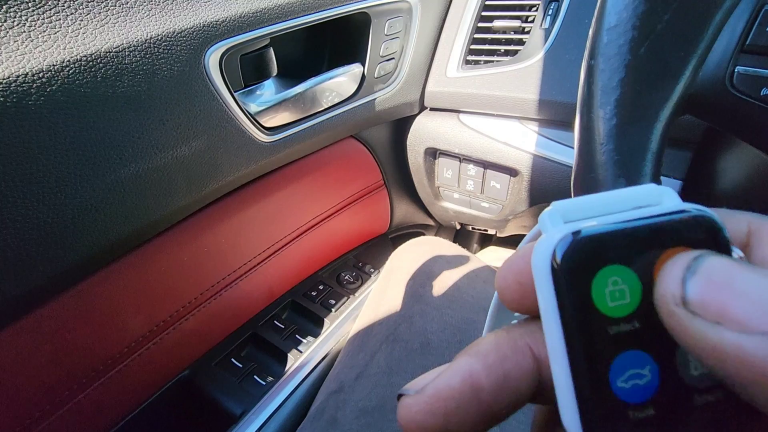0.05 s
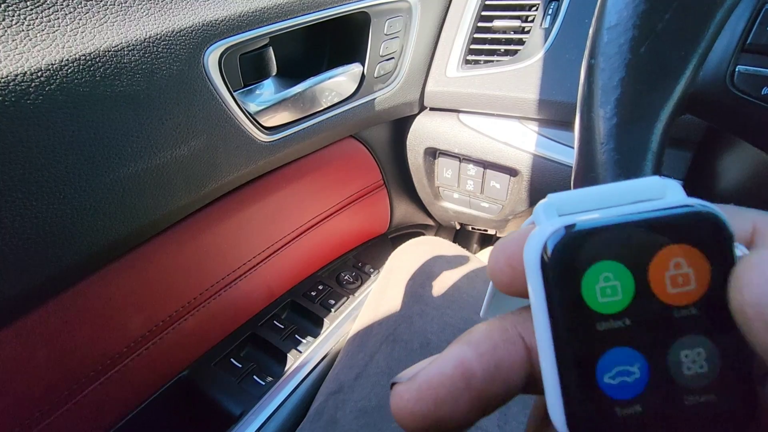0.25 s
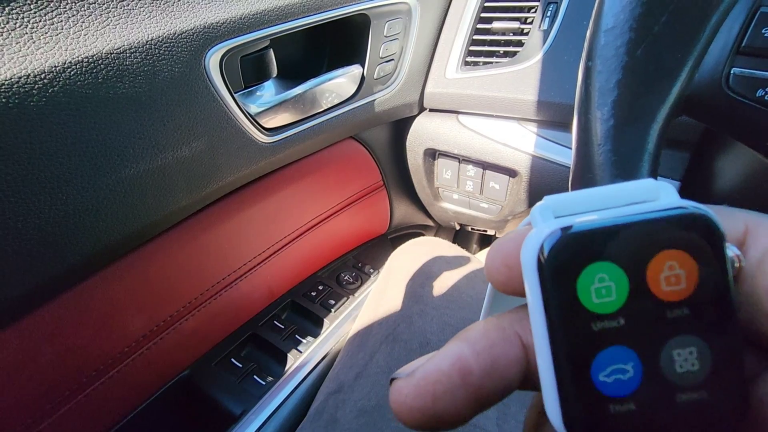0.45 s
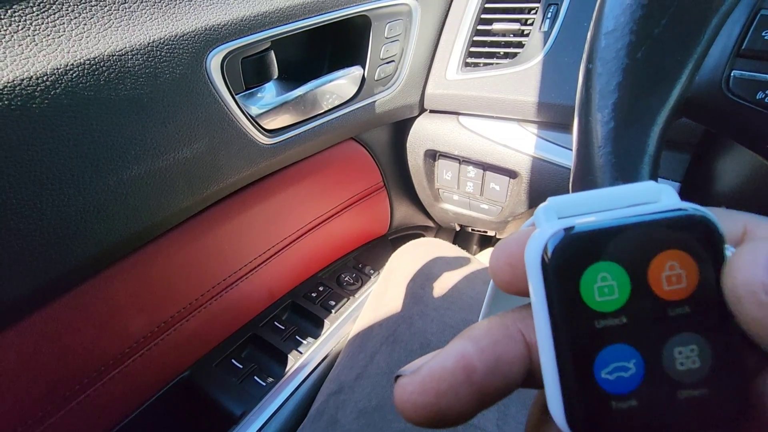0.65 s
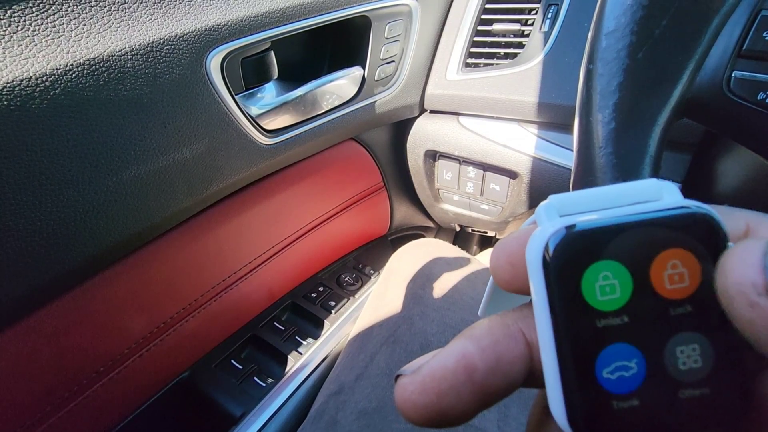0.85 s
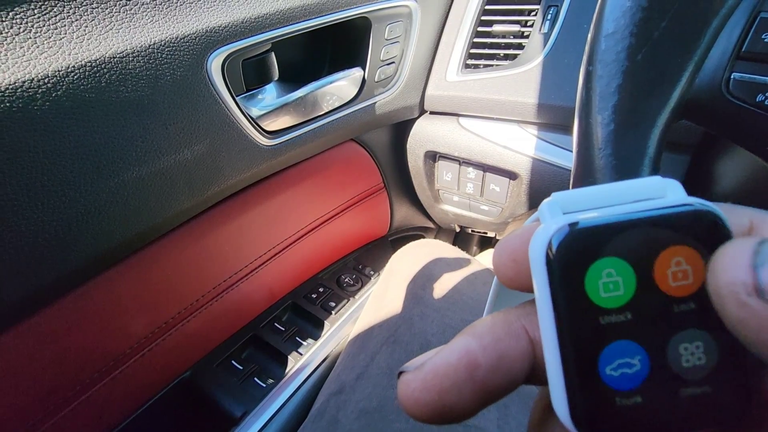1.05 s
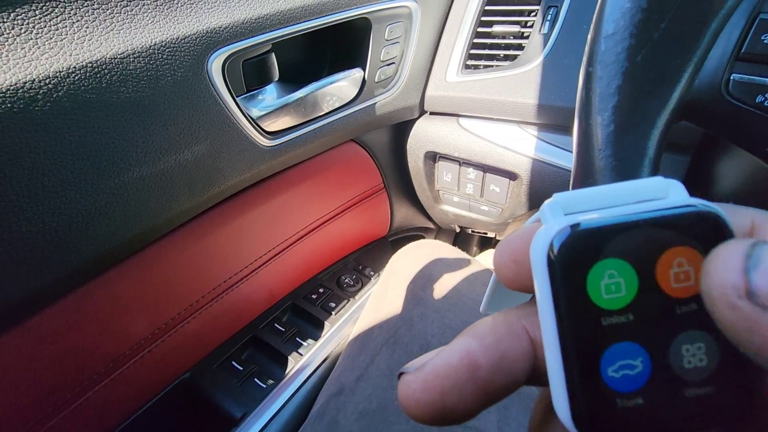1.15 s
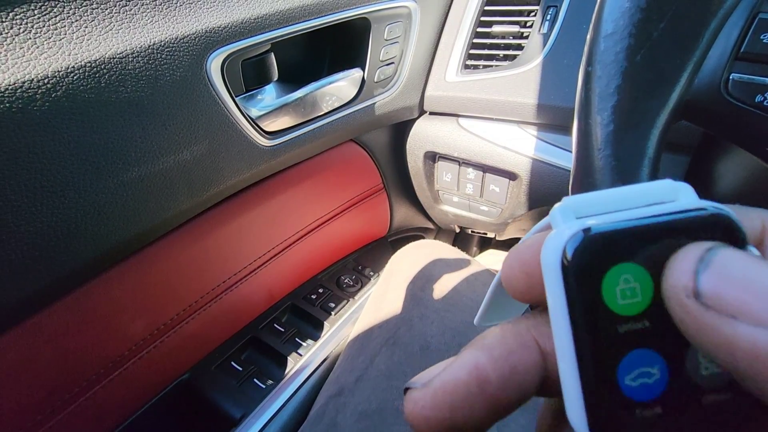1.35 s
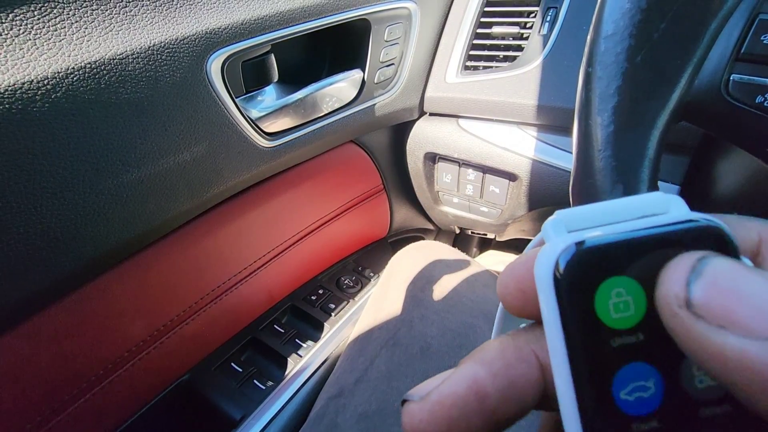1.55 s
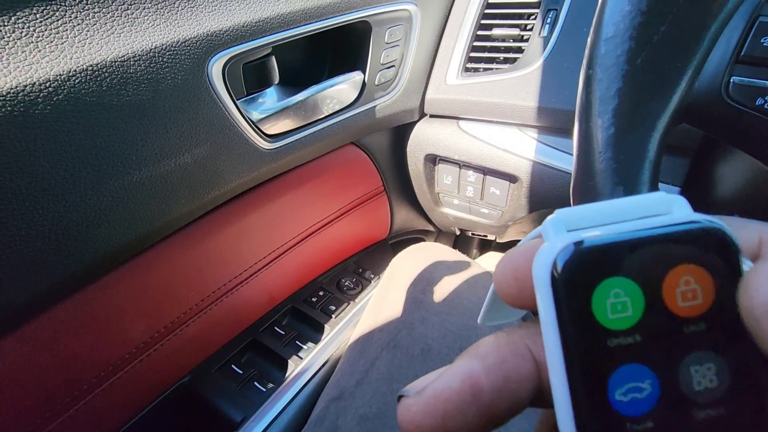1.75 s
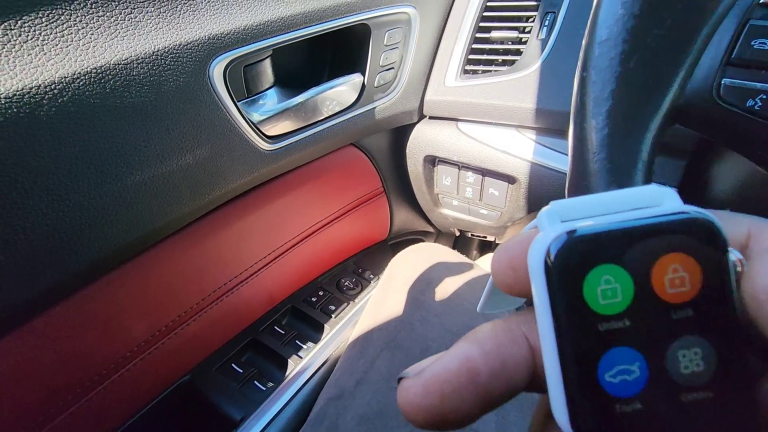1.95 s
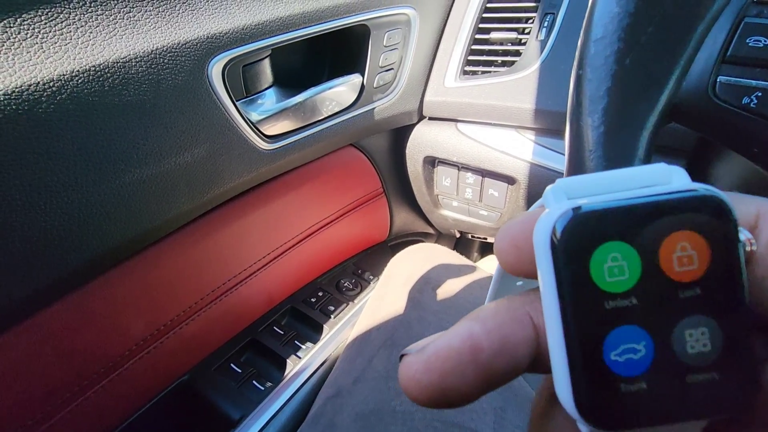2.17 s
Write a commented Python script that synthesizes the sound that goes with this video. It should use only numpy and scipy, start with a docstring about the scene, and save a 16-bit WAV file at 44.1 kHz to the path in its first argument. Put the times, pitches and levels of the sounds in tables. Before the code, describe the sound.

Inside a quiet parked car, muffled low rumble of distant traffic runs first; then the central locking fires with one sharp, rattling clunk, picked up close in stereo with a very short, dry cabin reflection.

```python
"""A low outside rumble with distant traffic is heard first, through the body of a parked car.
The power locks then shut: a relay ticks, a whirr swells, and the latches of several doors snap over
within a tenth of a second and thump the door panels. The background is noise shaped in pitch and time;
relay, latches and panels are sums of decaying modes, with noise for the hiss, whirr and rattle.
Sparse reflections inside the cabin follow the relay and latches."""
import sys
import numpy as np
from scipy import signal
from scipy.fft import rfft, irfft
from scipy.io import wavfile
from scipy.ndimage import uniform_filter1d

SR = 44100
rng = np.random.default_rng(int(sys.argv[2]) if len(sys.argv) > 2 else 0)


def persist_wave(psi):
    """Save psi, clipped to +-1, as 16-bit WAV."""
    counts = np.round(np.clip(psi, -1, 1) * 32767).astype(np.int16)
    wavfile.write(sys.argv[1], SR, np.atleast_2d(counts).T)


N = 97416  # length in samples


def amp(db):
    """Decibel law: twenty decibels are a factor of ten in amplitude."""
    return 10 ** (np.asarray(db) / 20)


def evened(x):
    """Normalisation to unit root-mean-square amplitude."""
    return x / np.sqrt(np.mean(x ** 2) + 1e-20)


def read(points, hz):
    """Spectral interpolation on a logarithmic pitch axis."""
    point_hz, value = np.transpose(points)
    return np.interp(np.log(hz + 1), np.log(point_hz + 1), value)


def add(mix, start_s, sound):
    """Superposition: a sound adds to the mix from its start time."""
    part = mix[:, round(start_s * SR):][:, :sound.shape[1]]
    part += sound[:, :part.shape[1]]


def panned(left_minus_right_db):
    """Interaural level difference, split equally between left and right gains."""
    return amp(np.multiply.outer([.5, -.5], left_minus_right_db))


def puff(centre_hz, width_hz):
    """Band-limited noise: independent stereo noise under a Gaussian; width_hz is its 1/e half-width."""
    hz = np.fft.rfftfreq(N, 1 / SR)
    colour = np.exp(-((hz - centre_hz) / width_hz) ** 2)
    return evened(irfft(rfft(rng.standard_normal((2, N))) * colour, N))


def ring(modes, t, sign=-1):
    """Modal superposition: dying sines answer one click; mode k is weighted by sign ** k."""
    total = 0
    for k, (pitch_hz, level_db, t60_s) in enumerate(modes):
        decay = amp(level_db - 60 * t / t60_s)
        total = total + sign ** k * decay * np.sin(2 * np.pi * pitch_hz * t)
    return total


# Levels of the outside noise: start_s, rumble_db, drone_db, traffic_roar_db
OUTSIDE_LEVELS = [
    [(0.03, -30, -40.5, -51), (0.112, -41, -41.5, -52), (0.26, -34.5, -41, -52.5),
     (0.286, -39.5, -39, -53.5), (0.384, -38, -39.5, -54.5), (0.956, -40, -45, -57.5),
     (1.262, -40.5, -43.5, -58.5), (1.528, -42, -48.5, -56), (1.622, -52, -43.5, -57),
     (1.656, -40.5, -49.5, -61.5), (1.8, -42.5, -47.5, -58.5)],
]
# The outside noise dies away at the end: start_s, rumble_db, drone_db, traffic_roar_db
FADING_LEVELS = [(2.0, -38, -45.5, -58.5), (2.1, -38.5, -48.5, -60.5), (2.14, -45, -49, -59),
                 (2.21, -52, -54.5, -59)]


def level(column):
    """Amplitude envelope: one layer's level in dB, interpolated over time."""
    rows = np.array(list(OUTSIDE_LEVELS[0]) + FADING_LEVELS)
    return np.interp(np.arange(N) / SR, rows[:, 0], rows[:, column])


# Likeness of the two channels, 1 identical and negative opposed: pitch_hz, likeness (no unit)
CHANNEL_LIKENESS = [(60, 1), (130, 1), (290, 0.92), (640, 0.35), (1410, -0.093), (3100, 0.48), (6820, 0.75),
                    (15000, -0.52)]
# Stereo lean of the outside noise: pitch_hz, left_minus_right_db
OUTSIDE_LEAN = [(60, 2.5), (110, -1), (200, 4.5), (380, 4.5), (700, 2), (1290, 6.5), (2380, 10), (4400, 12),
                (8120, 3), (15000, 0)]
LEFT_LEAD_S = .00014


def band(shape, level_db, patchy_db):
    """Partially coherent noise: random short-time spectra, patchy in time and pitch, on a level curve."""
    frames, hz = N // 512 + 5, np.fft.rfftfreq(2048, 1 / SR)
    a, b, c, d, patches = rng.standard_normal((frames, len(hz), 5)).T
    patches = uniform_filter1d(patches, size=16, axis=0)  # across pitch
    patches = evened(uniform_filter1d(patches, size=6, axis=1))  # across time

    likeness = np.clip(read(CHANNEL_LIKENESS, hz), -1, 1)[:, None]
    left = a + 1j * b
    right = likeness * left + np.sqrt(1 - likeness ** 2) * (c + 1j * d)
    spectra = np.array([left, right])

    # Both ends of the spectrum are closed by steep skirts
    closed = [(shape[0][0] * .8, -60)] + list(shape) + [(shape[-1][0] * 1.15, -70)]
    spectra *= amp(read(closed, hz)[:, None] + patchy_db * patches)
    spectra *= panned(read(OUTSIDE_LEAN, hz))[:, :, None]
    spectra[0] *= np.exp(1j * 2 * np.pi * hz * LEFT_LEAD_S)[:, None]
    noise = signal.istft(spectra, nperseg=2048, noverlap=1536)[1][:, :N]
    return amp(level_db) * evened(noise)


# Level of a fuzzy hum: start_s, level_db
HUM_LEVELS = [(.5, -69.5), (1.3, -59), (1.45, -60), (1.65, -54), (1.819, -53), (1.999, -67.5)]
HUM_HZ, HUM_WIDTH_HZ = 244.2, 12


def hum():
    """Narrow-band noise: a small bandwidth gives a pitch with a fluctuating envelope."""
    start_s, level_db = np.transpose(HUM_LEVELS)
    envelope = amp(np.interp(np.arange(N) / SR, start_s, level_db))
    return envelope * puff(HUM_HZ, HUM_WIDTH_HZ)[0]


# Spectrum of the outside rumble: pitch_hz, density_db (dB per Hz)
RUMBLE_SPECTRUM = [(11, -37), (18, -8), (43, 11.5), (59, -6.5), (92, 11), (130, -13.5), (170, -44.5),
                   (290, -120)]
# Spectrum of the low drone: pitch_hz, density_db (dB per Hz)
DRONE_SPECTRUM = [(59, -32.5), (100, -6.5), (189, 6), (225, -10.5), (274, -5), (301, -7.5), (373, -19.5),
                  (450, -20.5), (580, -45), (990, -120)]
# Spectrum of the traffic roar: pitch_hz, density_db (dB per Hz)
ROAR_SPECTRUM = [(240, -29.5), (400, -6.5), (487, -5), (516, -10.5), (567, -3), (694, -1), (1170, -2),
                 (1600, -14), (2080, -41.5), (3520, -120)]
# Spectrum of the steady hiss: pitch_hz, density_db (dB per Hz)
HISS_SPECTRUM = [(850, -29.5), (1450, -4.5), (2090, -1.5), (2960, -13.5), (3200, -18.5), (4150, -15),
                 (5160, -28.5), (6100, -29.5), (9070, -41.5), (13000, -37), (15500, -44)]
HISS_DB = -65


def outside():
    """Superposition of noise bands: rumble, drone, traffic roar and hiss, with the hum."""
    fuzzy_hum = hum()
    rumble = band(RUMBLE_SPECTRUM, level(1), patchy_db=0.9)
    drone = band(DRONE_SPECTRUM, level(2), patchy_db=0.6)
    roar = band(ROAR_SPECTRUM, level(3), patchy_db=1.2)
    hiss = band(HISS_SPECTRUM, HISS_DB, patchy_db=-1.86)
    return rumble + drone + roar + hiss + fuzzy_hum


# Faint rustles, and a small tick at 1.425 s: centre_s, length_s (between 1/e points), level_db, pitch_hz,
# width_hz
RUSTLE_PUFFS = [(0.273, 0.057, -86.5, 5960, 2000), (0.399, 0.038, -72.5, 4630, 1210),
                (0.862, 0.034, -80, 5600, 250), (0.889, 0.013, -70, 4100, 300),
                (1.425, .004, -73, 5000, 3000), (1.72, 0.078, -79.5, 6070, 2000)]


def rustles():
    """Amplitude modulation: Gaussian puffs of treble noise, roughened by random steps in level."""
    t = np.arange(N) / SR
    steps = np.repeat(rng.standard_normal(N // 64 + 1), 64)[:N]
    scratch = evened(amp(2.2 * steps))
    total = np.zeros((2, N))
    for centre_s, length_s, level_db, pitch_hz, width_hz in RUSTLE_PUFFS:
        envelope = np.exp(-((t - centre_s) / (.5 * length_s)) ** 2)
        total += amp(level_db) * envelope * puff(pitch_hz, width_hz)
    return total * scratch


# Door panel modes, before the favouring of pitches: pitch_hz, level_db, t60_s
PANEL_MODES = [(65.7, -10, .4), (92.5, -15.5, 0.19), (118.9, -5.5, 0.26), (146, -2, 0.12),
               (184.5, 0.5, 0.1), (258.4, -3.5, 0.08), (300, -4, 0.098), (346.3, 1, .09), (431, -9, 0.11)]
PANEL_LEAN_DB, PANEL_LAG_S = 1, 0.00022  # left minus right level; delay of the right channel
FAVOUR_DB_PER_OCT2 = -5  # modes far from the favoured pitch are rung less


def thump(level_db, push_s, favoured_hz):
    """Forced modal response: convolution with a soft push rings the panel modes."""
    t = np.arange(SR // 2) / SR
    push = np.sin(np.pi * np.minimum(t[:1000] / push_s, 1)) ** 2
    push /= push.sum()
    modes = []
    for pitch_hz, mode_db, t60_s in PANEL_MODES:
        favour_db = FAVOUR_DB_PER_OCT2 * np.log2(pitch_hz / favoured_hz) ** 2
        modes.append((pitch_hz, mode_db + favour_db, t60_s))

    def channel(lag_s):
        """Propagation delay: the modes begin after lag_s."""
        rung = ring(modes, np.maximum(t - lag_s, 0), sign=0.97)
        return np.convolve(rung, push)[:len(t)]

    return amp(level_db) * panned(PANEL_LEAN_DB)[:, None] * np.array([channel(0), channel(PANEL_LAG_S)])


# Thumps into the door panels: start_s, level_db, push_s, favoured_hz
PANEL_THUMPS = [(1.867, -27, 0.00089, 220), (1.89, -21.5, 0.0021, 260), (1.904, -16.5, 0.0022, 161.2),
                (1.923, -16, 0.0016, 170), (1.951, -18.5, 0.0041, 150), (1.983, -22, 0.0045, 118)]
PANEL_CUT_HZ = 75


def door_panels():
    """Linear superposition of panel thumps, followed by a high-pass filter."""
    panels = np.zeros((2, N))
    for start_s, *row in PANEL_THUMPS:
        add(panels, start_s, thump(*row))
    high_pass = signal.butter(4, PANEL_CUT_HZ, "high", fs=SR, output="sos")
    return signal.sosfilt(high_pass, panels)


CABIN_T60_S, CABIN_DB = .06, -10


def cabin(x):
    """Room impulse response: short sparse reflections off glass and trim, about 8000 a second."""
    t = np.arange(SR // 4) / SR
    taps = rng.choice([-1., 1.], (2, len(t)))
    taps *= rng.random((2, len(t))) < 8000 / SR
    taps *= amp(-60 * t / CABIN_T60_S)
    taps /= np.linalg.norm(taps, axis=1, keepdims=True)
    return signal.fftconvolve(x, taps, axes=1)[:, :N]


# Modes of the relay tick: pitch_hz, level_db, t60_s
TICK_MODES = [(4200, 0, .028), (5100, -14, .012), (5900, -16, .015), (8300, -12, .02)]
# Modes of the armature landing: pitch_hz, level_db, t60_s
LANDING_MODES = [(2050, 0, .04), (2500, -1, .035), (3300, -10, .02)]
RELAY_S, RELAY_DB = 1.8363, -36
RELAY_HISS_DB, RELAY_T60_S = -46.5, 0.018
LANDING_DELAY_S, LANDING_DB = .003, -2  # level relative to the tick
# Actuators running between the relay and the first snap; WHIRR_DB is the starting level, from which the whirr
# swells by WHIRR_SWELL_DB up to the first snap
WHIRR_DB, WHIRR_HZ, WHIRR_WIDTH_HZ, WHIRR_SWELL_DB = -45.5, 2040, 2200, 6.5


def relay():
    """Impact excitation: a bright tick and a duller landing, with a noise whirr until the first snap."""
    t = np.arange(4096) / SR
    span_s = LATCH_SNAPS[0][0] - RELAY_S
    hiss = puff(5960, 4500)[:, :len(t)] * amp(-60 * t / RELAY_T60_S)

    whirr = puff(WHIRR_HZ, WHIRR_WIDTH_HZ)[:, :len(t)]
    whirr *= np.minimum(t / .008, 1) * amp(WHIRR_SWELL_DB * t / span_s) * (t < span_s)
    grit = evened(uniform_filter1d(rng.standard_normal(len(t)), size=90))
    whirr *= evened(amp(3.0 * grit))  # uneven level

    late = np.maximum(t - LANDING_DELAY_S, 0)
    landing = np.minimum(late / .0015, 1) * ring(LANDING_MODES, late)
    tick = ring(TICK_MODES, t) + amp(LANDING_DB) * landing
    onset = np.minimum(t / 0.00073, 1)
    return onset * (amp(RELAY_DB) * tick + amp(RELAY_HISS_DB) * hiss) + amp(WHIRR_DB) * whirr


# Spectrum of the rattle, before the brightness tilt: pitch_hz, density_db (dB per Hz)
RATTLE_SPECTRUM = [(180, -15), (300, 1.5), (453, -4.5), (720, -1.5), (1280, -6.5), (1420, -10.5),
                   (1970, -3.5), (2360, -13), (3280, -7.5), (4490, -9.5), (5210, -15.5), (7370, -19),
                   (9600, -30), (15500, -39)]
# Stereo lean of the rattle, before each snap's own lean: pitch_hz, left_minus_right_db
RATTLE_LEAN = [(200, 1.5), (400, 3.5), (700, 1.5), (1300, 4.5), (2400, 5), (4400, .5), (8000, -4),
               (15000, -7)]
# Latch modes, before the scatter: pitch_hz, level_db, t60_s
LATCH_MODES = [(715, -11, .03), (1270, -8, .022), (1870, -2, .018), (2014, 0, .02), (2920, -13, .018),
               (3260, -8, .022), (4371, -16, .015), (4640, -16, .015), (5475, -19, .012), (7340, -22, .01)]
RATTLE_RISE_S, STRIKE_S = 0.0006, .0012  # rise times of the rattle and of the modes
LATCH_SCATTER_DB, LATCH_SCATTER = 2.5, .015  # each strike varies the modes (dB, share of pitch)


def snap(rattle_db, left_minus_right_db, bright_db, t60_s, ring_db):
    """Impact excitation: a hard strike rings the latch modes, and a grainy noise rattle decays."""
    t = np.arange(8192) / SR
    hz = np.fft.rfftfreq(len(t), 1 / SR)
    grains = amp(2.8 * np.minimum(rng.exponential(1, (2, len(t))), 3)[0])
    knocks = rng.standard_normal((2, len(t))) * grains
    tilt_db = bright_db * np.log2(np.maximum(hz, 300) / 2000)
    colour = amp(read(RATTLE_SPECTRUM, hz) + tilt_db) * (hz > 200)
    colour = colour * panned(read(RATTLE_LEAN, hz))
    envelope = np.minimum(t / RATTLE_RISE_S, 1) * amp(-60 * t / t60_s)
    rattle = evened(irfft(rfft(knocks) * colour, len(t))) * envelope

    scatter_db = LATCH_SCATTER_DB * rng.standard_normal((2, len(LATCH_MODES)))
    detune = 1 + LATCH_SCATTER * rng.standard_normal((2, len(LATCH_MODES)))
    rung = np.zeros((2, len(t)))
    for side in range(2):
        modes = [(pitch_hz * ratio, level_db + extra_db, mode_t60_s)
                 for (pitch_hz, level_db, mode_t60_s), extra_db, ratio
                 in zip(LATCH_MODES, scatter_db[side], detune[side])]
        rung[side] = ring(modes, t)
    rung *= np.minimum(t / STRIKE_S, 1)
    return panned(left_minus_right_db)[:, None] * (amp(rattle_db) * rattle + amp(ring_db) * rung)


# Latch snaps: start_s, rattle_db, left_minus_right_db, brightness (dB per octave), rattle_t60_s, ring_db
LATCH_SNAPS = [(1.8679, -17.5, 5.5, 1.1, 0.12, -21.5), (1.8853, -11.5, -2, 2.36, 0.041, -20),
               (1.8878, -22.5, 2.5, 3, 0.077, -13), (1.8965, -18, 1.6, 0, 0.097, -15.5),
               (1.904, -21, 2, -1.8, 0.12, -19), (1.9108, -30, -1.5, -0.3, 0.067, -18.5),
               (1.9181, -17, -1.8, -1.5, 0.068, -19), (1.9258, -22, 0, -2.5, 0.063, -21),
               (1.9335, -27, 4, -3.5, 0.1, -27), (1.9431, -36.5, -4, -4.5, 0.037, -27),
               (1.951, -37, 2.5, -6, 0.098, -34)]


def locks():
    """Linear superposition of the relay and the latch snaps."""
    latches = np.zeros((2, N))
    add(latches, RELAY_S, relay())
    for start_s, *row in LATCH_SNAPS:
        add(latches, start_s, snap(*row))
    return latches


def scene():
    """Superposition of direct sound, cabin reflections, door panels and background."""
    latches = locks()
    panels = door_panels()
    return latches + amp(CABIN_DB) * cabin(latches) + panels + outside() + rustles()


EDGE_HZ = 15500


def record(dry):
    """Band limiting: a linear-phase low-pass filter removes the highest treble."""
    low_pass = signal.firwin(1023, EDGE_HZ, window=("kaiser", 9), fs=SR)
    return signal.oaconvolve(dry, low_pass[None], "same")


dry = scene()
out = record(dry)
persist_wave(out)
```